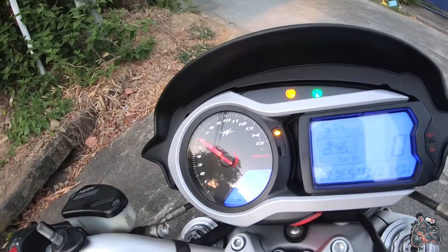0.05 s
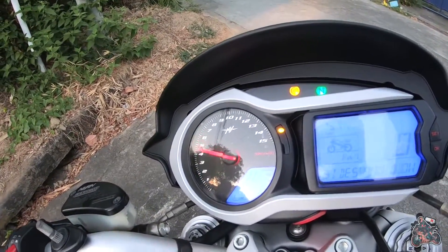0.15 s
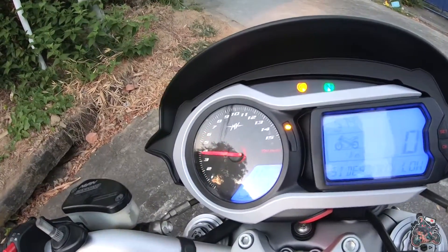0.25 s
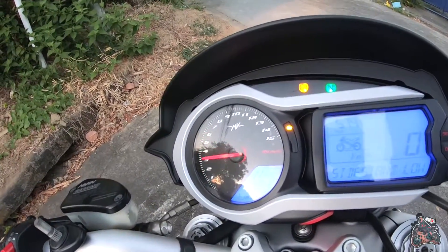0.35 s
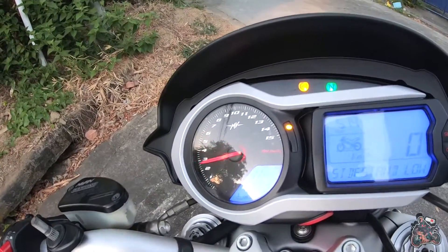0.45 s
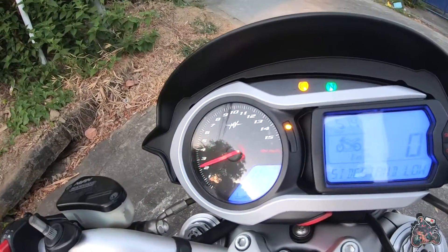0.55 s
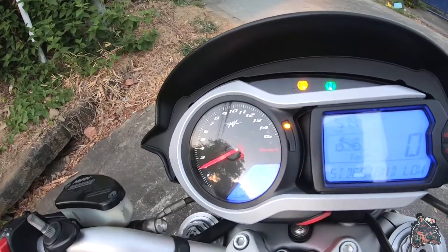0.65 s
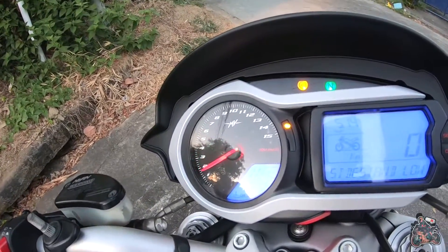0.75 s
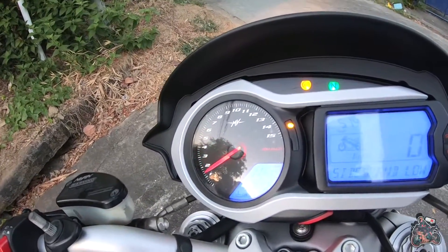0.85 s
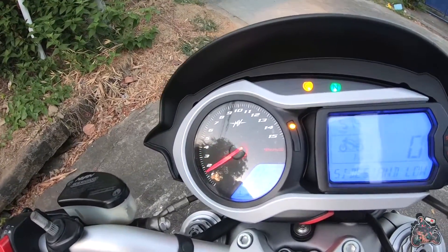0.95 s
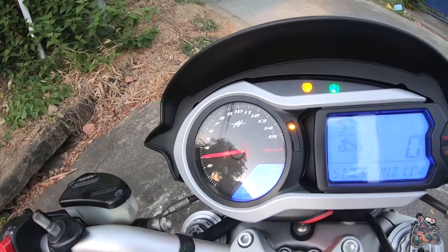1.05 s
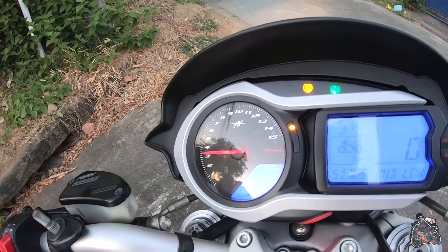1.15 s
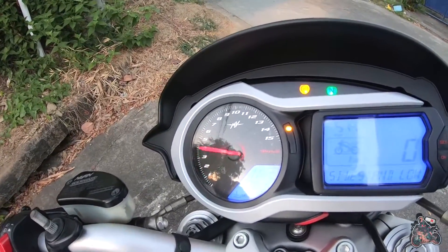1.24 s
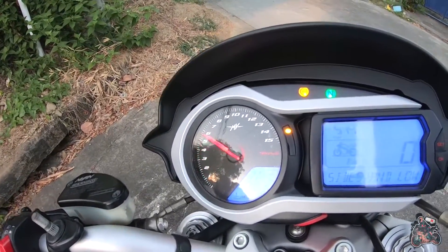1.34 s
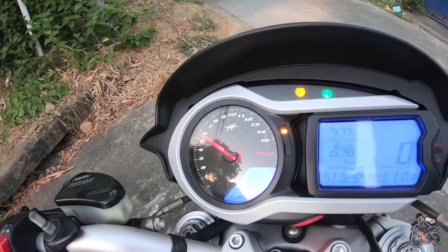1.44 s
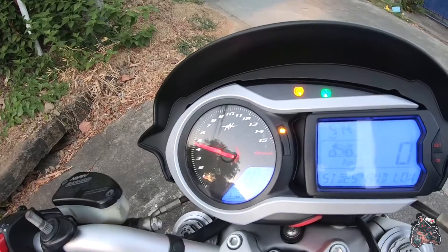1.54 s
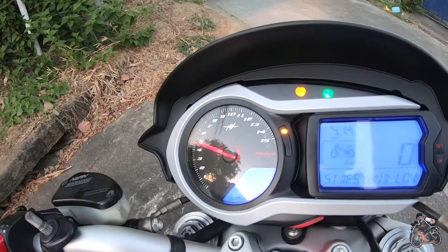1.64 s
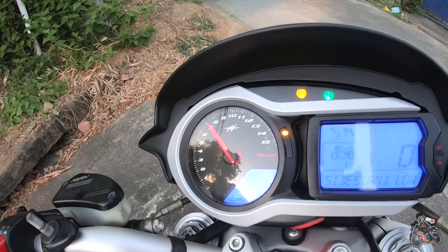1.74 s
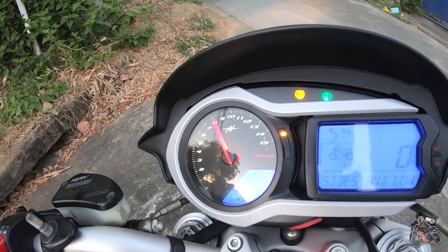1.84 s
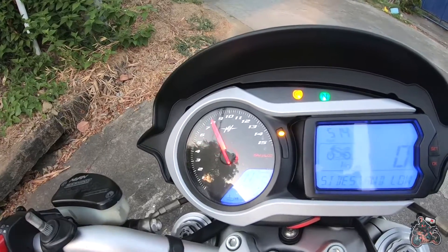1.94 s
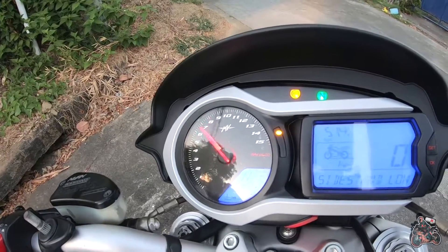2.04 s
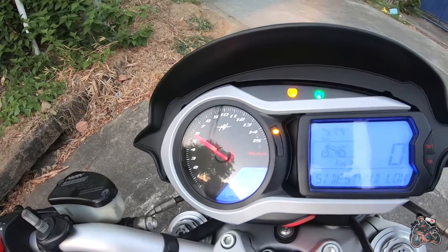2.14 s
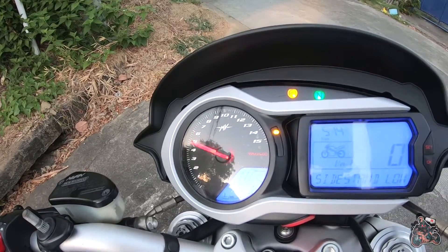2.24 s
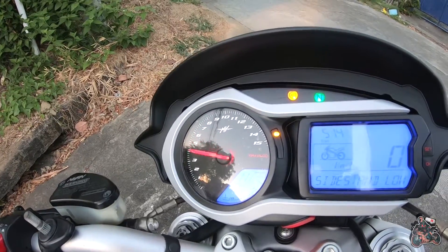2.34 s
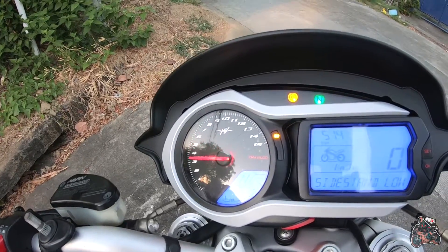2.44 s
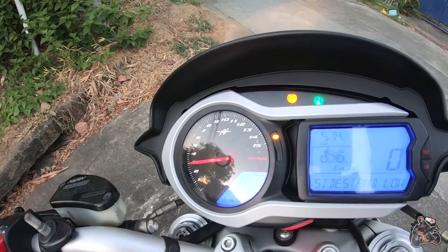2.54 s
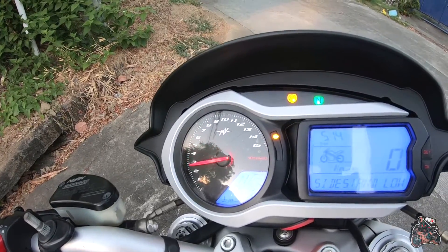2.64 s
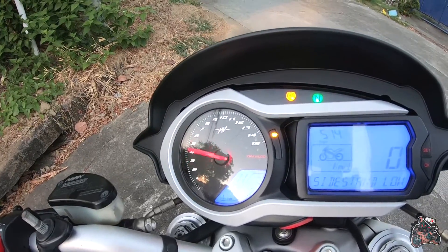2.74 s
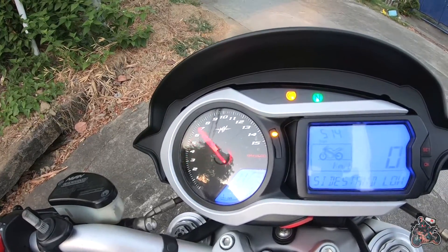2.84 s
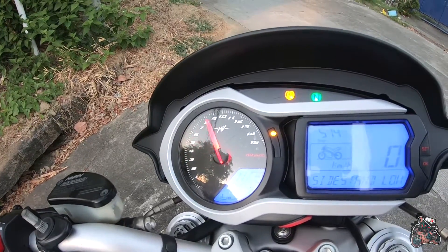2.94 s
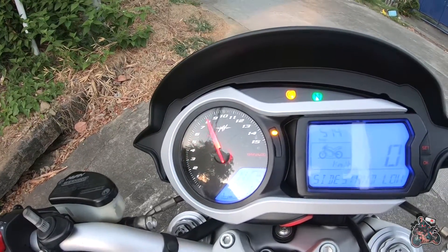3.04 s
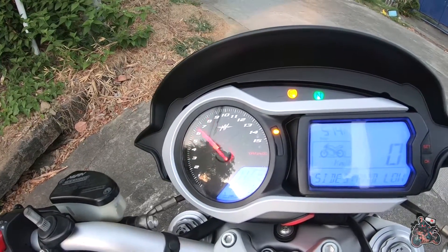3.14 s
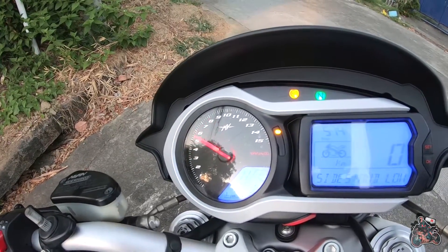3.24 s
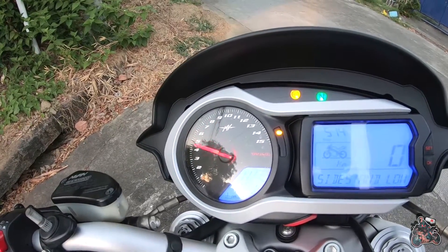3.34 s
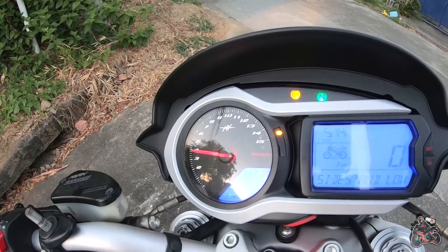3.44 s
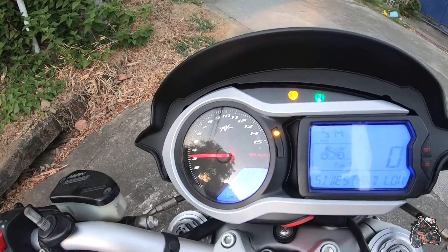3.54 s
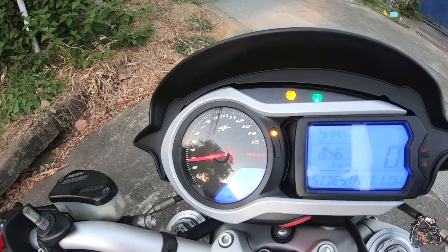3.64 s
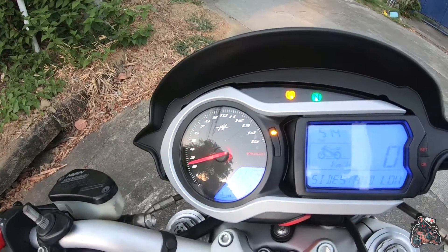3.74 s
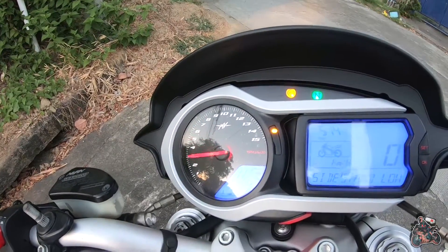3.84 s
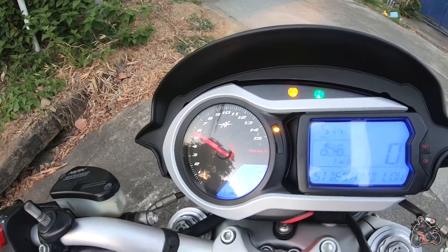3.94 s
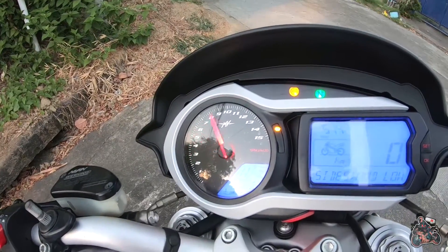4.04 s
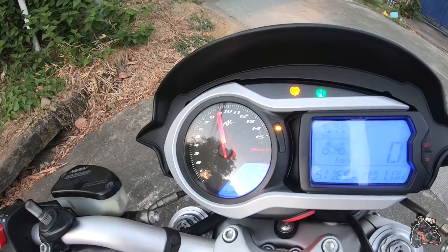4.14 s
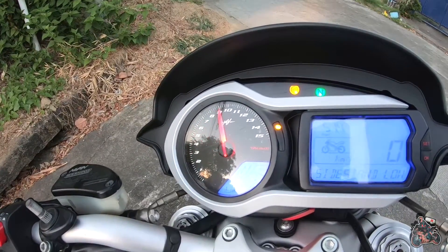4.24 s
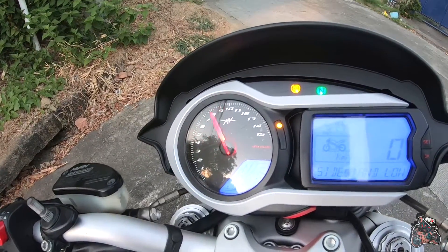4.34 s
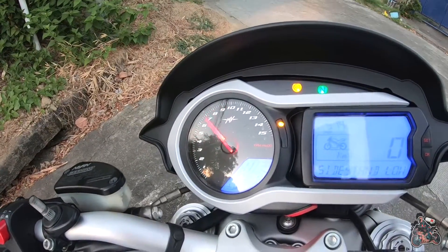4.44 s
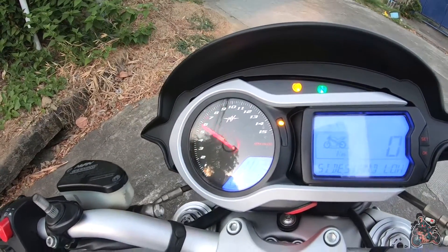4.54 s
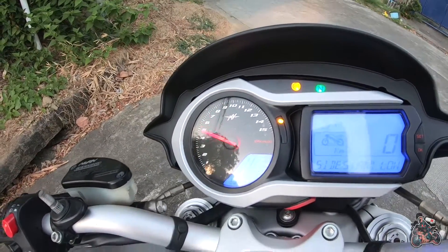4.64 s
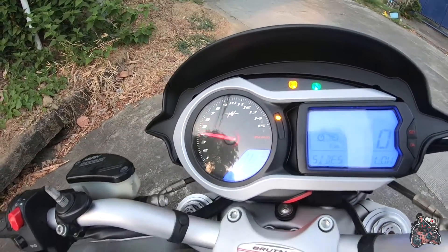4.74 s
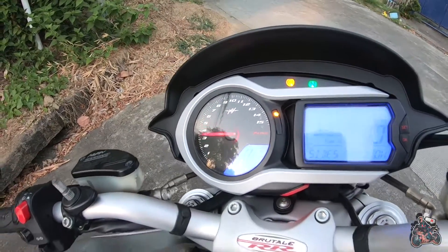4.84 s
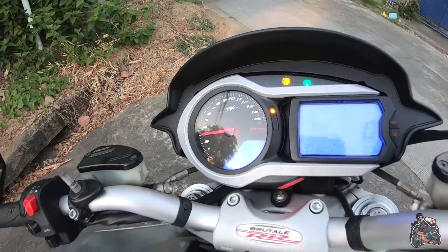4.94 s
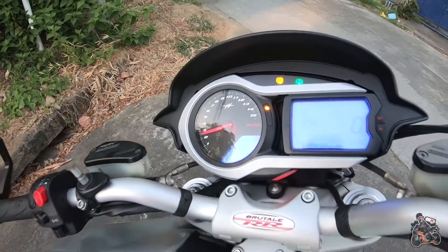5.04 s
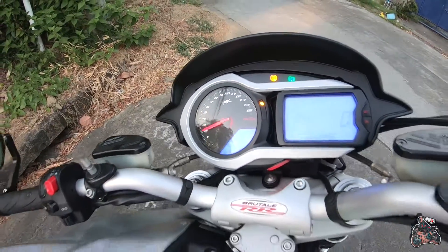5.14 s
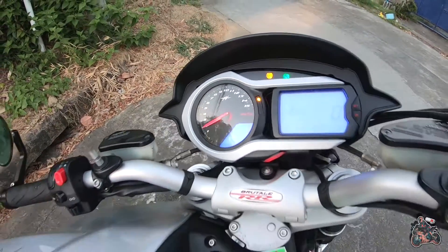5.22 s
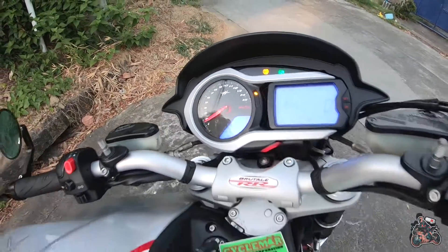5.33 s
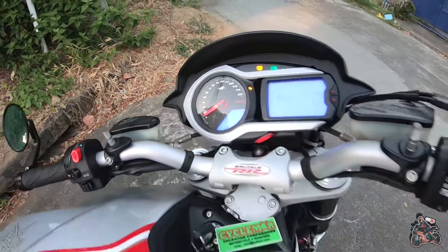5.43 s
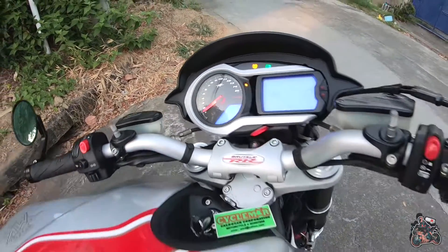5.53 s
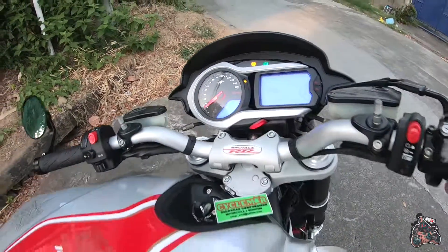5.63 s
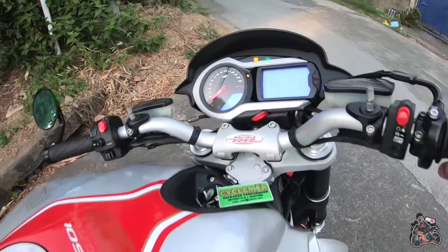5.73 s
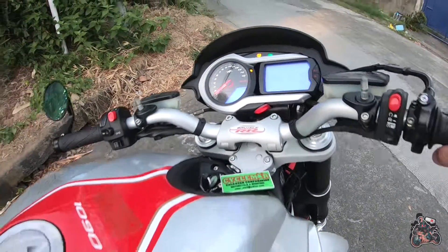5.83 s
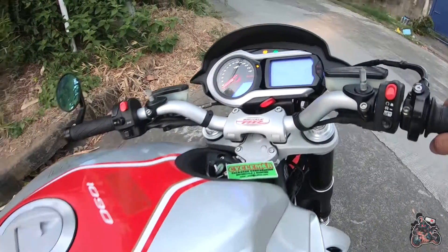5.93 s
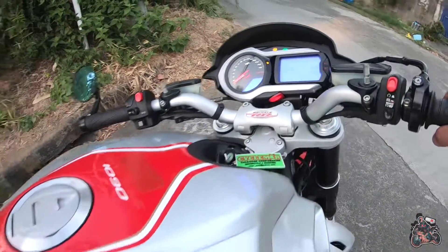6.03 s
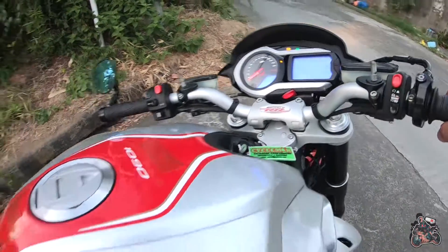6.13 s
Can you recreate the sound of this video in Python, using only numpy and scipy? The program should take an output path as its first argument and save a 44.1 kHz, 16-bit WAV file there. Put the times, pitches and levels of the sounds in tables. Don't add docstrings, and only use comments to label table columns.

```python
import sys
import numpy as np
from scipy import signal
from scipy.fft import rfft, irfft, next_fast_len
from scipy.io import wavfile
from scipy.ndimage import uniform_filter1d, map_coordinates

SR = 44100
rng = np.random.default_rng(int(sys.argv[2]) if len(sys.argv) > 2 else 0)


def file_out(sig):
    cols = np.atleast_2d(sig).T
    lim = np.clip(cols, -1, 1)
    pcm = np.round(lim * 32767).astype(np.int16)
    wavfile.write(sys.argv[1], SR, pcm)


def gain_from_db(level_db):
    decades = np.asarray(level_db, float) / 20
    return 10 ** decades


N = 272538

# (time [s], firing rate [Hz])
FIRING_RATE = [
    [(0, 207.4), (.05, 189.5), (.15, 156.7), (.29, 121.6), (.46, 90.2), (.6, 63.8), (.7, 51.86),
     (.81, 43.1), (.89, 38.82)],
    [(.91, 42), (.95, 50.4), (1.0, 86.5), (1.03, 110.6), (1.06, 119.9), (1.15, 113.7)],
    [(1.19, 120.8), (1.24, 157.8), (1.29, 195), (1.32, 216.7), (1.34, 212), (1.44, 182.6), (1.56, 147.8)],
    [(1.58, 154.3), (1.63, 198.9), (1.7, 262), (1.75, 282.5), (1.86, 287), (1.91, 278), (1.99, 256.4),
     (2.2, 181.7), (2.62, 83.2)],
    [(2.635, 88.4), (2.68, 127.4), (2.77, 210.8), (2.86, 290.3), (2.89, 292.8), (2.99, 283.5),
     (3.11, 238.6), (3.49, 121.8), (3.74, 68.9)],
    [(3.755, 70), (3.87, 168.4), (3.94, 231.5), (3.99, 286.6), (4.03, 299.7), (4.2, 311.7), (4.29, 306),
     (4.41, 246.7), (4.92, 102.5)],
    [(5.13, 66.2), (5.3, 45.6), (5.4, 39.9), (5.51, 38.73), (6.18, 38.66)],
]
# (opening time [s], held [s], closing [s], opening [0-1])
GRIP_TWISTS = [
    (0.888, .14, 0.065, 0.73),
    (1.163, 0.13, 0.024, 0.73),
    (1.568, 0.26, 0.29, 0.79),
    (2.626, 0.27, 0.14, 0.9),
    (3.755, 0.448, 0.1, .97),
]
OPENING_S = 0.019
# (time [s], half length [s], loss [dB])
MISFIRES = [(.55, 0.17, 10), (0.893, 0.039, 24), (1.005, 0.013, 14), (1.12, 0.19, 8), (1.26, .03, 15),
            (1.316, .015, -5), (1.625, 0.075, 7.5), (2.637, 0.017, 19), (3.542, 0.033, -1),
            (3.724, 0.023, 10), (4.183, 0.08, 17), (5.154, 0.017, 21)]

# (firing rate [Hz], level [dB])
TONE_SHUT = [(39.5, -22.5), (52, -20), (70, -21), (100, -26.5), (155, -15.5), (210, -13), (285, -7.5),
             (303, -10)]
TONE_OPEN = [(45, -14), (90, -11), (130, -11.5), (230, -11.5), (275, -12.5), (291, -14), (303, -13),
             (311, -20)]
# (firing rate [Hz], level [dB])
OCTAVE = [(39.5, -30.5), (44, -53)]
TONE_LAG, OCTAVE_LAG = 0.46, 0.45
# (firing rate [Hz], silencer [dB], pipe [dB], intake [dB], clatter [dB], gas hiss [dB])
LEVELS_SHUT = [(38.16, -28, -36, -44.5, -47.5, -63), (44.56, -29.5, -34, -41.5, -49.5, -69),
               (63.6, -27.5, -29.5, -41.5, -49.5, -65), (101.3, -24, -25, -38.5, -43, -58),
               (201, -28.5, -18, -28.5, -36.5, -50), (260, -19.5, -24.5, -29.5, -35.5, -47)]
LEVELS_OPEN = [(51.6, -19, -23, -34.5, -44, -62), (124, -18, -17, -29, -37.5, -53.5),
               (242, -27, -17.5, -24, -40, -55), (303.6, -18, -22.5, -18, -39, -51.5),
               (317.6, -20.5, -20, -22, -32, -47.5)]
# (firing rate [Hz], alternate cylinders differ [0-1],
# one cylinder leads [0-1], scatter of firings [0-1], turbulence share [0-1])
BURN_SHUT = [(40, .04, .25, .1, .58), (46, .3, .2, .35, .5), (100, .5, .3, .5, .55),
             (128, .9, .4, .22, .32), (200, .9, .55, .12, .24), (280, .9, .55, .12, .25)]
BURN_OPEN = [(60, .12, .12, .14, .27), (125, .15, .2, .15, .3), (245, .2, .25, .17, .33),
             (283, .7, .75, .07, .18), (300, .9, .7, .04, .1)]
STAGGER = 0.071

# (delay [s], level [dB])
CHAMBERS = [(0, -1.5), (.0072, -2), (0.0108, -3)]
# (pitch [Hz], width [Hz], level [dB])
PIPE = [(278, 95.5, 4), (351, 93, 5.5), (453.4, 102, 1.5), (595, 230, -11)]
# (pitch [Hz], width [Hz], level [dB])
AIRBOX = [(766, 123, 1), (970, 160, -1.5), (1090, 110, -1.5), (1243, 99, -1), (1407, 110, 6),
          (1523, 122, 7), (1779.5, 81, 4), (2062, 110, -3), (2700, 230, -13)]
# (firing rate [Hz], level [dB])
GROWL = [(60, -39), (130, -19), (230, -23.5), (285, -28.5)]
# (pitch [Hz], width [Hz], level [dB])
CHAIN = [(2290, 260, 0)]
CHAIN_DB = -45

# (time [s], peak [dB], pitch [Hz], length [s])
THUMPS = [(0.32, -18.5, 51.4, 0.11), (0.506, -22, 43, 0.041), (1.094, -14, 55.3, 0.092),
          (1.141, -15, 89.3, 0.053), (1.337, -20.5, 63.6, 0.085), (1.606, -22.5, 72.2, 0.058),
          (1.781, -27, 80.5, 0.04), (1.917, -11.5, 94.5, 0.038), (1.993, -12.5, 90.5, 0.023),
          (2.369, -18, 61.8, 0.2), (2.501, -15, 48.6, 0.13), (2.575, -16, 71.3, 0.041),
          (2.957, -31, 58.36, 0.08), (3.037, -12.5, 79, 0.023), (3.424, -19, 66.4, 0.13),
          (3.544, -18, 95.6, 0.11), (3.646, -16, 46, 0.11), (4.3, -16, 80, 0.015),
          (4.795, -21.5, 58.3, 0.12), (4.861, -26, 101.5, 0.057), (4.948, -23, 102, 0.038),
          (5.03, -19, 60, 0.06)]
# (time [s], peak [dB], pitch [Hz])
CRACKS = [(0.299, -15.5, 343), (1.171, -13, 425), (1.201, -5, 480), (2.622, -24, 463),
          (2.646, -18.5, 403.3), (2.665, -11.5, 540), (3.056, -1, 370), (3.776, -12, 336)]
# (time [s], peak [dB], pitch [Hz])
PLATE_SNAPS = [(0.2977, -21, 1190), (1.1731, -15, 1620), (2.621, -24, 1560), (2.644, -30, 1590),
               (2.6654, -15, 1614)]

# (frequency [Hz], density [dB per Hz])
CASES = [(450, -18), (700, 2), (1100, -5), (1500, -3.5), (2300, -3), (2900, -6.5), (3700, -4), (4500, -21),
         (6000, -47), (9000, -58)]
# (frequency [Hz], density [dB per Hz])
GAS_JETS = [(3000, -24.5), (4500, 4), (6000, -3.5), (7800, -11.5), (8800, -11.5), (10400, -13),
            (10900, -21.5), (13500, -24), (15200, -32)]
# (pitch [Hz], width [Hz], lift [dB])
COVERS = [(2166, 270, 2.5), (2573, 160, 3.5), (3675, 1180, -8), (6290, 570, 3), (7560, 1700, 11.5),
          (10400, 600, 1.5)]
# (frequency [Hz], correlation [-1 to 1])
LIKENESS = [(500, 0.24), (1000, 1), (1500, 0.48), (2200, 0.68), (3200, 0.5), (4500, 0.51), (6000, -0.076),
            (8000, -0.36), (13000, 0.26)]
TWIST_DB = 1

# (time [s], level [dB])
GAIN = [(0, 0.6), (.3, 1.4), (.6, 2.7), (.9, 3.9), (1.3, 1.8), (1.8, 0.95), (2.2, -0.9), (2.6, 1.1),
        (2.9, 1.15), (3.3, -2.1), (3.7, -1.4), (4.1, -0.6), (4.5, -2.76), (4.9, -1.95), (5.25, 0.5),
        (5.5, -0.2), (6.18, 5)]
# (time [s], half length [s], loss [dB])
DUCKS = [(1.08, 0.052, 5.5), (1.22, .06, 3.5), (1.6, 0.022, 1.5), (2.75, .07, 2), (3.91, .04, 1)]
# (time [s], stereo [0-1])
STEREO = [(0, 0), (3.08, 0), (3.4, .4), (3.8, 1), (6.18, 1)]
STEREO_HISS_DB, STEREO_METAL_DB = 6, 3
# (frequency [Hz], left minus right [dB])
PORT_LEAN = [(60, -0.5), (120, 1), (230, 0.5), (440, 1.5), (870, -1.5), (1690, -6.5), (3290, -2)]
# (frequency [Hz], left leads [rad])
PORT_LEAD = [(0, -1.165), (430, 0.25), (1210, -1.08), (1640, 0.33), (3450, 0.034)]


def engine():
    log_hz, = curves([(s, np.log(hz)) for blip in FIRING_RATE for s, hz in blip])
    hz = np.exp(log_hz)
    grip = np.clip(throttle(), 0, 1)
    turns = np.cumsum(hz) / SR
    stereo, = curves(STEREO)
    twist = 4 * grip * (1 - grip) * TWIST_DB
    silencer_db, pipe_db, intake_db, clatter_db, hiss_db = by_throttle(LEVELS_SHUT, LEVELS_OPEN, hz, grip)
    pair, lead, scatter, share = by_throttle(BURN_SHUT, BURN_OPEN, hz, grip)
    pulses = firings(turns, pair, lead, scatter, STAGGER * pair * (1 - grip), slip=0.07)
    gas = rng.standard_normal((4, N))

    boom = blend(silencer(pulses), silencer(gas[0]), scatter)
    boom = boom * gain_from_db(14.8 * (lead - pair))
    opening = np.clip((intake_db - clatter_db - 4.0) / 8, 0, 1)
    voice = firing_tone(turns, hz, grip, scatter)
    voice = voice + gain_from_db(silencer_db) * boom
    voice = voice + gain_from_db(pipe_db + 1.5) * exhaust_pipe(pulses, gas[1], turns, share)
    voice = voice + gain_from_db(intake_db - 0.5) * opening * airbox(pulses, gas[2], turns, share)
    voice = voice + header_growl(gas[3], turns, hz, grip) + cam_chain(gas[3], hz, grip, stereo)

    ticks = 0.36 * np.sqrt(39 / hz)
    cases_db = clatter_db + 8.5 + STEREO_METAL_DB * stereo + 0.23 * twist + 0.49 * wobble(6)
    jets_db = hiss_db + STEREO_HISS_DB * stereo + twist + 2.0 + wobble(9)
    metal = gain_from_db(cases_db) * clatter(turns, CASES, ticks)
    metal = metal + (gain_from_db(jets_db) + gain_from_db(-76.0)) * clatter(turns, GAS_JETS, ticks / 2)
    return voice, metal


def throttle():
    t = np.arange(N) / SR
    opening = np.zeros(N)
    for s, held, closing, far in GRIP_TWISTS:
        opening += far * np.interp(t - s, np.cumsum([0, OPENING_S, held, closing]), [0, 1, 1, 0])
    return opening


def firings(turns, pair, lead, scatter, stagger, slip):
    k = np.arange(int(turns[-1]) - 1) + 2
    luck = rng.standard_normal((len(k), 2))
    i = np.interp(k, turns, np.arange(N)).astype(int)
    odd_even = (-1.) ** k
    size = 1 + 0.5 * pair[i] * odd_even
    size = size + 0.77 * lead[i] * np.array([1, 0, -1, 0])[k % 4] + scatter[i] * luck[:, 0]
    late = slip * scatter[i] * luck[:, 1] + stagger[i] * odd_even
    late = late + slip * lead[i] * np.array([0.5, 6.5, 0.0, 3.0])[k % 4] / 4
    at = np.clip(np.interp(k + late, turns, np.arange(N)), 0, N - 2)
    i = at.astype(int)
    train = np.bincount(i, size * (1 - at + i), N) + np.bincount(i + 1, size * (at - i), N)
    return train - np.gradient(turns) * (1 + 2 * np.cos(2 * np.pi * turns))


def firing_tone(turns, hz, grip, scatter):
    tone_db = by_throttle(TONE_SHUT, TONE_OPEN, hz, grip)[0] - dips(MISFIRES)
    level = np.sqrt(2) * gain_from_db(tone_db + 6.6 * scatter * wobble(33))
    tone = level * np.cos(2 * np.pi * (turns - TONE_LAG) + scatter * wobble(25))
    octave = np.sqrt(2) * gain_from_db(along(OCTAVE, hz)) * np.cos(4 * np.pi * (turns - OCTAVE_LAG))
    return tone + octave


def silencer(x):
    def response(hz):
        echoes = sum(gain_from_db(db) * np.exp(-2j * np.pi * hz * s) for s, db in CHAMBERS)
        return echoes / (1 + (hz / 220) ** 16) * hz ** 2 / (hz ** 2 + 50 ** 2) ** 1.2
    return filtered(x, response)


def exhaust_pipe(pulses, gas, turns, share):
    clean = band(resonant(pulses, PIPE), 202, 837)
    rush = band(resonant(gas * gate(turns, 0.18, 0.34), PIPE), 213, 627)
    return blend(clean, rush, 2.93 * share ** 2)


def airbox(pulses, gas, turns, share):
    clean = band(resonant(pulses, AIRBOX), 620, 2500)
    rush = band(resonant(gas * gate(turns, 0.6, 0.2), AIRBOX), 620, 2700)
    return blend(clean, rush, 1.5 * share ** 2)


def header_growl(gas, turns, hz, grip):
    return grip * gain_from_db(along(GROWL, hz)) * steady(band(gas * gate(turns, 1.0, 0.25), 423, 707))


def cam_chain(noise, hz, grip, stereo):
    level = gain_from_db(CHAIN_DB + 2.3 * wobble(25)) * (1 - grip) * stereo * np.sqrt(hz / 150)
    return level * steady(resonant(resonant(noise, CHAIN), CHAIN))


def afterfire():
    out, t = np.zeros(N + SR), np.arange(SR // 4) / SR
    for s, db, hz, length in THUMPS:
        swell = np.sin(np.pi * np.clip(t / length, 0, 1) ** 0.27) ** 2
        out[round(s * SR):][:len(t)] += gain_from_db(db + 6.5) * swell * np.sin(2 * np.pi * hz * t)
    for s, db, hz in CRACKS + PLATE_SNAPS:
        decay = gain_from_db(db - 3.0 - 60 * t / 0.064) * (1 - np.exp(-t / 0.00027))
        out[round(s * SR):][:len(t)] += decay * np.sin(2 * np.pi * hz * t)
    return out[:N]


def clatter(turns, spectrum, ticks):
    taps = 1 + ticks * np.cos(2 * np.pi * turns) + 0.04 * np.cos(np.pi * turns + 1.1)
    z = signal.stft(rng.standard_normal((2, N)) * taps, nperseg=512)[2]
    field = uniform_filter1d(rng.standard_normal(z.shape[1:]), size=5, axis=0)
    field = uniform_filter1d(field, size=8, axis=1)
    pair = signal.istft(z * gain_from_db(1.73 * field / field.std()), nperseg=512)[1][:, :N]

    def response(hz):
        angle = np.arccos(np.clip(along(LIKENESS, hz), -1, 1)) / 2
        lift = sum(db / (1 + (2 * (hz - c) / w) ** 2) for c, w, db in COVERS)
        return gain_from_db(along(spectrum, hz) + lift) * [np.cos(angle), np.sin(angle)]
    mid, side = filtered(pair, response)
    return np.array([mid + side, mid - side]) / np.std(mid)


def ground(x):
    t = np.arange(SR // 8) / SR
    tail = rng.standard_normal((2, len(t))) * gain_from_db(-60 * t / 0.36)
    wet = signal.fftconvolve(x[None], tail / np.linalg.norm(tail[0]), axes=1)[:, :N]
    return filtered(wet, lambda hz: hz ** 2 / (hz ** 2 + 900 ** 2))


def gate(turns, depth, lag):
    return np.exp(depth * np.cos(2 * np.pi * (turns - lag)))


def blend(clean, noise, share):
    share = np.clip(share, 0, 1)
    return np.sqrt(1 - share) * steady(clean) + np.sqrt(share) * steady(noise)


def steady(x):
    power = uniform_filter1d(uniform_filter1d(x ** 2, size=SR // 10), size=SR // 10)
    return x / np.sqrt(np.abs(power) + 1e-12)


def by_throttle(shut, wide, hz, grip):
    return (1 - grip) * by_speed(shut, hz) + grip * by_speed(wide, hz)


def by_speed(rows, hz):
    f, *cols = np.transpose(rows)
    return np.array([np.interp(np.log(hz), np.log(f), c) for c in cols])


def curves(rows):
    s, *cols = np.transpose(rows)
    return [np.interp(np.arange(N) / SR, s, c) for c in cols]


def along(points, hz):
    f, v = np.transpose(points)
    return np.interp(np.log(hz + 1), np.log(f + 1), v)


def dips(rows):
    t = np.arange(N) / SR
    return sum(db * np.clip(1 - np.abs(t - s) / length, 0, 1) for s, length, db in rows)


def wobble(rate):
    knots = rng.standard_normal(int(N * rate / SR) + 4)
    return map_coordinates(knots, [np.arange(N) * rate / SR])


def filtered(x, response):
    m = next_fast_len(N + SR // 2)
    return irfft(rfft(x, m) * response(np.fft.rfftfreq(m, 1 / SR)), m)[..., :N]


def resonant(x, modes):
    def response(f):
        total = 0
        for k, (c, w, db) in enumerate(modes):
            total = total + (-1) ** k * gain_from_db(db) * 1j * f * w / (c * c - f * f + 1j * f * w)
        return total
    return filtered(x, response)


def band(x, low_hz, high_hz):
    return signal.sosfilt(signal.butter(3, [low_hz, high_hz], "band", fs=SR, output="sos"), x)


def scene():
    voice, metal = engine()
    gain = gain_from_db(curves(GAIN)[0])
    voice = gain * voice + afterfire()
    return voice + gain_from_db(-33.0) * ground(voice) + gain * gain_from_db(-dips(DUCKS)) * metal


def roll_off(x):
    return signal.sosfilt(signal.butter(12, 15150, fs=SR, output="sos"), x)


def record(dry):
    half = np.array([[.5], [-.5]])

    def ports(hz):
        shading = gain_from_db(along(PORT_LEAN, hz) * half) * np.exp(1j * along(PORT_LEAD, hz) * half)
        return shading * (1j * hz / (28 + 1j * hz)) ** 2
    left, right = filtered(dry, ports)
    mid, side = (left + right) / 2, (left - right) / 2
    side = curves(STEREO)[0] * side + gain_from_db(-4) * band(side, 11000, 15000)
    x = np.array([mid + side, mid - side])
    x = x / (1 + np.abs(x / 0.88) ** 4) ** (1 / 4)
    return roll_off(x)


dry = scene()
out = record(dry)
file_out(out)
```